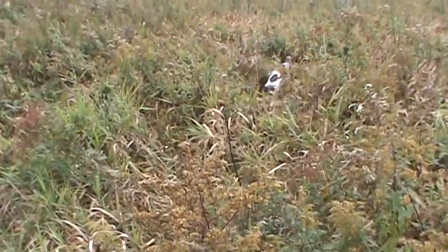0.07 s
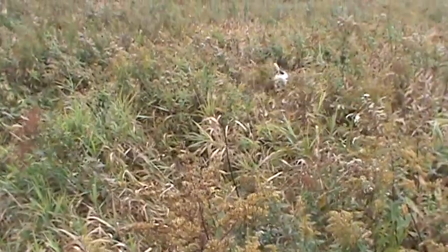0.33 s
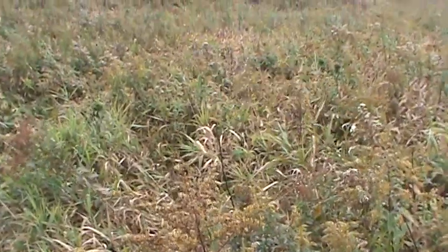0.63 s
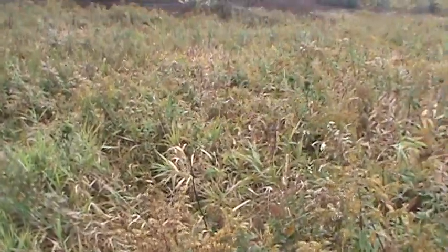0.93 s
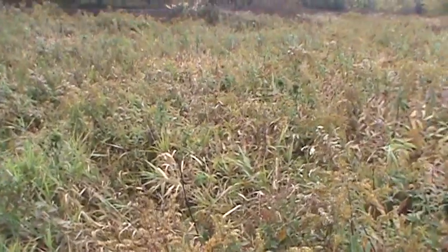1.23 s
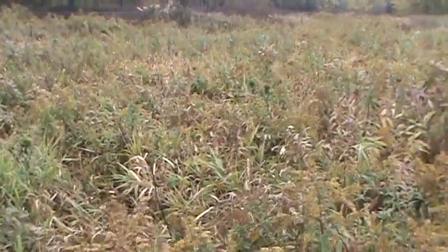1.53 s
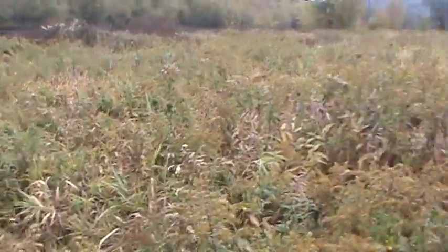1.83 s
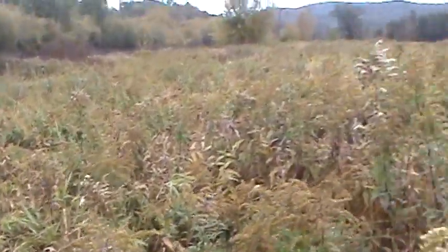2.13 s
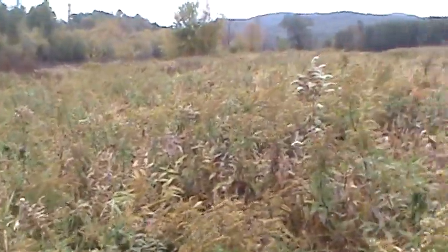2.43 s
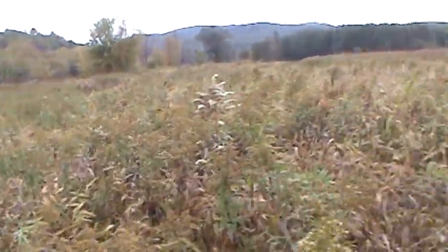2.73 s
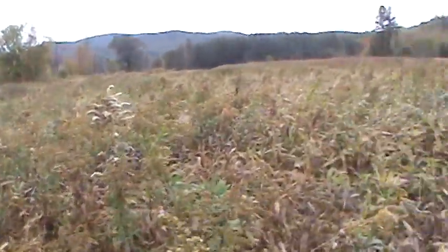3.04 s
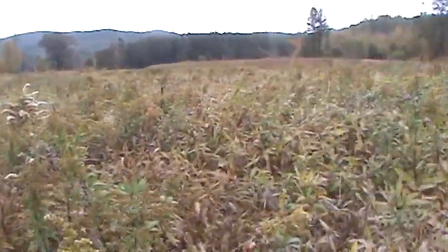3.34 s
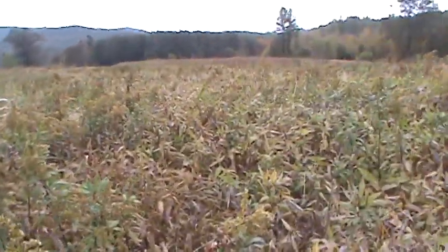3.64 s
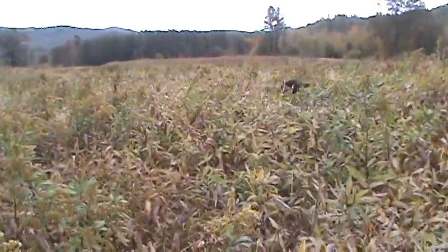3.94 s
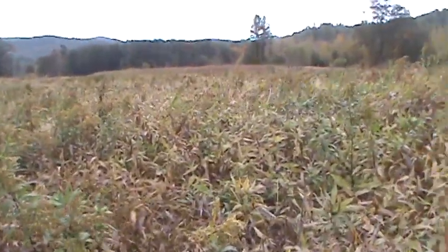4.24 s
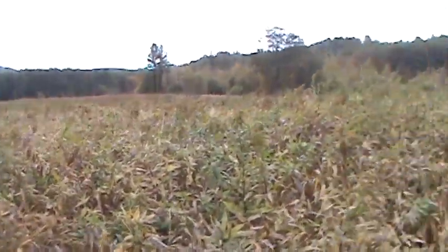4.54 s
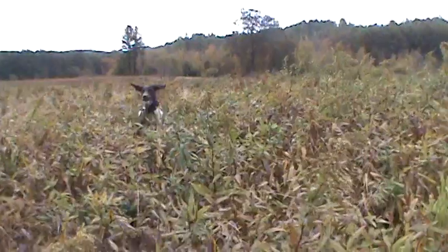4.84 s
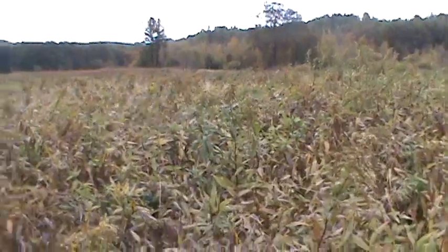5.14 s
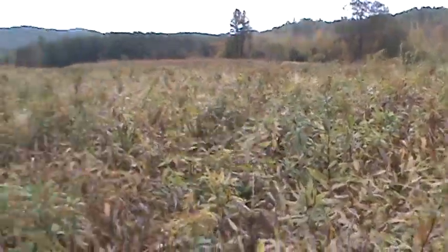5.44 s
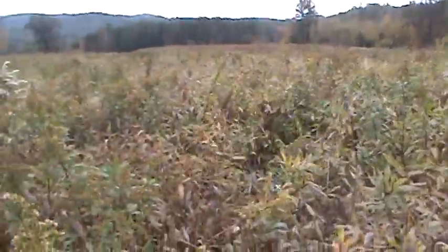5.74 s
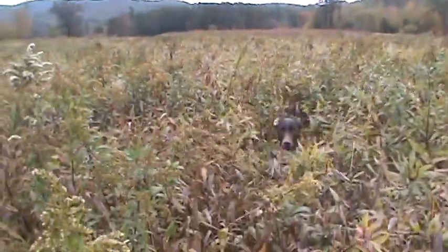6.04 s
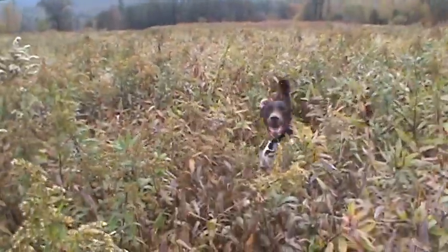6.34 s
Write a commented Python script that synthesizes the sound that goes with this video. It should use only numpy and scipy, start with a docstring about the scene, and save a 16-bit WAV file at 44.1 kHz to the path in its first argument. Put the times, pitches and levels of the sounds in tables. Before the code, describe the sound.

Dry brush rustles and crackles around a running dog while its little bell clinks brightly, with soft paw thuds underneath.

```python
"""A field of tall dry weeds: a dog bounds through it and comes running up close.
The clapper of its small collar bell strikes unevenly, ringing the wall's modes and then choking them.
Leaves swish and crackle along its body with each bound, over a low trampling rumble and faint far air.
Paws thud on soft ground, stalks snap, and a hand-held camera gives a few hollow plastic clicks."""
import sys
import numpy as np
from scipy import signal
from scipy.io import wavfile
from scipy.ndimage import uniform_filter1d

SR = 44100
rng = np.random.default_rng(int(sys.argv[2]) if len(sys.argv) > 2 else 0)


def inscribe(sig):
    """Save sig as 16-bit PCM at rate SR to the path in sys.argv[1].

    A 1-D sig is mono; a 2-D sig holds one channel per row.
    Samples are clipped to [-1, 1] before scaling.
    """
    pcm = np.round(np.clip(np.atleast_2d(sig).T, -1, 1) * 32767)
    wavfile.write(sys.argv[1], SR, pcm.astype(np.int16))


N = 285768
TIME = np.arange(N) / SR
SIDES = np.array([[1], [-1]])  # left, right

# Clapper hits on the bell: (time [s], fundamental level [dB], second mode level [dB],
# overtone level [dB], pitch the struck spot favours [Hz], fundamental t60 [s])
CLAPPER_HITS = [(0.045, -34, -48, -20.5, 5000, 0.15), (0.1177, -40, -49, -23.5, 6155, 0.63),
                (0.229, -18, -31, -19, 5000, 0.052), (0.2962, -33, -47, -28, 5000, 0.24),
                (0.4178, -26, -53, -22, 5000, 0.11), (0.519, -26, -66, -27, 8810, 0.077),
                (0.542, -27.5, -48, -36, 6155, 0.25), (0.5755, -26, -45, -18.5, 5000, 0.19),
                (0.694, -27.5, -43, -56, 6155, 0.21), (0.773, -29, -41.5, -35, 5000, 0.33),
                (0.881, -29, -57, -33, 5000, 0.25), (1.0127, -33, -50, -24.5, 4424, 0.25),
                (1.022, -24, -38, -19.5, 5412, 0.16), (1.085, -23.5, -29, -16.5, 7680, 1.0),
                (1.1146, -21, -25, -24, 4424, 0.21), (1.198, -12.5, -28.5, -20.5, 6155, 0.19),
                (1.2483, -27, -49, -23.5, 6155, 0.11), (1.2657, -22, -31, -12.5, 4424, 0.1),
                (1.3036, -17, -35, -16.5, 6155, 0.12), (1.361, -40, -58, -32.5, 5412, 0.2),
                (1.425, -23.5, -55, -27, 7680, 0.6), (1.473, -30, -43, -34, 6155, 0.19),
                (1.4916, -16.5, -27, -14.5, 6155, 0.045), (1.5068, -15, -18, -24, 7680, 0.022),
                (1.518, -20, -29.5, -21, 8810, 0.18), (1.589, -24, -39.5, -26.5, 5412, 0.19),
                (1.6915, -31, -37.5, -22.5, 4424, 0.25), (1.811, -17, -32.5, -14, 5000, 0.062),
                (1.9021, -25.5, -43, -23, 5000, 0.056), (2.084, -29.5, -48, -28, 5000, 0.44),
                (2.1407, -29, -49, -41, 4424, 0.13), (2.226, -28, -28.5, -17.5, 5000, 0.11),
                (2.3406, -19, -26.5, -15.5, 5000, 0.042), (2.3777, -32, -58, -30, 5000, 0.21),
                (2.609, -30.5, -53, -35, 6155, 0.091), (2.827, -15.5, -35, -14, 5000, 0.022),
                (2.8856, -20.5, -48, -15, 5000, 0.049), (3.0062, -35, -36.5, -31.5, 7680, 0.27),
                (3.1157, -28, -33, -28, 7680, 0.18), (3.2309, -31, -51, -34.5, 5000, 0.21),
                (3.303, -30.5, -54, -18, 6155, 0.096), (3.3838, -25.5, -68, -27, 7680, 0.36),
                (3.3916, -26, -52, -25.5, 5000, 0.11), (3.4521, -22, -36, -18, 5412, 0.16),
                (3.488, -19.5, -34, -13, 5412, 0.15), (3.5337, -29, -40, -36, 5412, 0.52),
                (3.6724, -13, -23, -18, 6155, 0.12), (3.733, -14.5, -25.5, -20.5, 8810, 0.076),
                (3.772, -22, -38, -25.5, 5000, 0.077), (3.845, -16, -33, -22.5, 6155, 0.091),
                (3.9342, -19, -32, -23.5, 5412, 0.099), (3.9593, -18, -42, -19.5, 8810, 0.095),
                (4.0518, -24, -39, -21, 7680, 0.34), (4.0739, -29.5, -39, -24.5, 5000, 0.26),
                (4.3386, -28, -32, -17.5, 5412, 0.11), (4.4639, -18, -18, -19.5, 8810, 0.17),
                (4.5214, -25, -52, -20, 4424, 0.069), (4.5535, -35, -53, -28.5, 6155, 0.14),
                (4.6541, -19.5, -23.5, -17.5, 6155, 0.11), (4.7122, -25, -36, -27.5, 5412, 0.21),
                (5.526, -43, -36, -21, 5412, 0.41), (5.6776, -27.5, -31, -16.5, 5000, 0.22),
                (5.8148, -20, -23, -15.5, 8810, 0.076), (5.8554, -29, -43, -37, 7680, 0.28),
                (5.9297, -31, -43, -31, 4424, 0.27), (5.966, -38.5, -49, -23, 5000, 0.5),
                (6.0338, -41.5, -51, -29, 5412, 0.3), (6.1859, -22.5, -29, -13, 6155, 0.13),
                (6.2273, -31.5, -30.5, -13.5, 5412, 1.0), (6.4356, -33.5, -29, -15.5, 6155, 0.48)]
# Modes of the bell wall: (pitch [Hz], level among the overtones [dB],
# shortness [0 = rings like the fundamental, 1 = like an overtone])
BELL_MODES = [(2005.6, 0, 0.0044), (3434, 0, .3), (4424, -2, .9), (5000, 4, 1), (5412, -5.5, 0.8),
              (6155, -3.5, 0.97), (7680, 0, .9), (8810, -5, 1), (11406, -1.5, 0.82), (11510, -5.5, .9),
              (12000, -12, 1), (12600, -11.5, 0.79), (13800, -12, 0.62), (14900, -16, 1)]


def from_db(db):
    """Decibels to gain."""
    return np.exp(np.asarray(db) * (np.log(10) / 20))


def at_hz(points, hz):
    """Read a curve on a log-frequency axis."""
    points = np.array(points)
    return np.interp(np.log(hz), np.log(points[:, 0]), points[:, 1])


def band(x, low_hz, high_hz):
    """Second-order Butterworth band-pass."""
    sos = signal.butter(2, [low_hz, min(high_hz, .45 * SR)], "band", fs=SR, output="sos")
    return signal.sosfilt(sos, x + 1e-18)


def drift(rate_hz):
    """Smooth random modulation with unit rms, drawn every 40 samples."""
    pole = np.exp(-80 * np.pi * rate_hz / SR)
    slow = signal.lfilter([1], [1, -2 * pole, pole * pole], rng.standard_normal(N // 40 + 2002))[2000:]
    slow /= np.sqrt(np.mean(slow ** 2) + 1e-20)
    return np.interp(np.arange(N) / 40, np.arange(len(slow)), slow)


def fade(age, t60):
    """Exponential decay, 60 dB down after t60 seconds."""
    return np.exp(-np.log(1000) * age / t60)


def ring(clicks, hz, t60):
    """Resonator: a unit click sets a sine of height 1 ringing."""
    radius, angle = fade(1 / SR, t60), 2 * np.pi * hz / SR
    return signal.lfilter([0, np.sin(angle)], [1, -2 * radius * np.cos(angle), radius ** 2],
                          clicks + 1e-18)


def impulses(times, levels_db):
    """One click per event."""
    out = np.zeros(N)
    out[np.clip(np.round(np.asarray(times) * SR).astype(int), 0, N - 1)] = from_db(levels_db)
    return out


def bursts(times, levels_db, t60):
    """A quickly dying puff of noise per event."""
    envelope = signal.lfilter([1], [1, -fade(1 / SR, t60)], impulses(times, levels_db) + 1e-18)
    return envelope * rng.standard_normal(N)


def banded_noise(spectrum, flicker_db, flicker_hz, sheen_db=0):
    """Stereo noise, normalised before each band flickers on its own and sheen lifts the treble."""
    # Stereo image: (frequency [Hz], left-right correlation [0..1])
    correlation = [(60, 0.97), (150, 1), (330, 0.83), (700, 0.87), (1400, 0.88), (2800, 1), (5500, 1),
                   (9000, 0.81), (14000, 0.69)]
    low, high = spectrum[0][0], min(spectrum[-1][0], .44 * SR)
    edges = np.geomspace(low, high, int(2.6 * np.log2(high / low)) + 1)
    white, out, power = rng.standard_normal((2, 2, N)), 0, 0
    for k, (low, high) in enumerate(zip(edges, edges[1:])):
        mid, side = band(white[k % 2], low, high)
        hz = np.sqrt(low * high)
        alike, gain = at_hz(correlation, hz), from_db(at_hz(spectrum, hz))
        treble = at_hz([(4000, 0), (10000, 1)], hz)
        power += 2 * gain ** 2 * np.var(mid)
        gain = gain * from_db(flicker_db * drift(flicker_hz) + treble * sheen_db)
        out = out + gain * (np.sqrt(1 + alike) * mid + np.sqrt(1 - alike) * side * SIDES)
    return out / np.sqrt(power)


def thicket(x, scatter_db, t60):
    """Stalks and ground scatter a short diffuse tail, different at each ear."""
    age = TIME[:SR // 4]
    tail = rng.standard_normal((2, len(age))) * fade(age, t60) * (age > .001)
    tail /= np.sqrt(np.sum(tail ** 2, axis=1, keepdims=True))
    return x + from_db(scatter_db) * signal.fftconvolve(np.atleast_2d(x), tail, axes=1)[:, :N]


def far_air(level_db=-58):
    """A faint, flickering bed of distant air."""
    # Colour of the air: (frequency [Hz], relative density [dB])
    air_colour = [(300, -8.5), (520, -25), (800, -16), (1300, 41), (3000, -0.5), (15000, 17)]
    return from_db(level_db) * banded_noise(air_colour, flicker_db=4.0, flicker_hz=13.0)


def swish_envelope(stir_db=-48, stir_sheen_db=-1, release_ratio=1.38):
    """Bounds swell and fall, adding in power over a steady stir of leaves. Gives level and sheen in dB."""
    # Bounds through the leaves: (peak time [s], level [dB], swell time [s], treble sheen [dB])
    bounds = [(.02, -41.5, 0.04, 2.5), (.25, -47, 0.17, 9.5), (.39, -41.5, 0.067, 3),
              (.56, -42, 0.031, -0.5), (.93, -45, 0.069, -1), (1.28, -48.5, 0.053, 4),
              (1.47, -41, 0.043, -1.5), (1.918, -43, 0.073, -4), (2.061, -40, 0.069, -3),
              (2.289, -45, 0.068, 2), (2.699, -39, 0.083, -3), (2.939, -44, .13, -2),
              (3.199, -38.5, 0.066, -4.5), (3.349, -41, .055, -2), (3.572, -41, 0.14, -4),
              (3.799, -40, 0.089, -2.5), (4.079, -43.5, 0.2, -4), (4.319, -38, 0.066, -6.5),
              (4.601, -45, 0.18, -7), (5.04, -37.5, 0.14, -1), (5.2, -35.5, 0.067, -1.5),
              (5.47, -33.5, 0.14, -2), (5.67, -32.5, 0.057, -1), (5.839, -37.5, 0.059, -1),
              (5.989, -43, 0.085, -0.5), (6.279, -39.5, 0.089, 0.5), (6.451, -31, 0.092, -2.5)]
    power = from_db(stir_db) ** 2
    sheen = power * stir_sheen_db
    for peak_s, db, swell_s, sheen_db in bounds:
        width = np.where(TIME < peak_s, swell_s, swell_s * release_ratio)
        bound = from_db(db) ** 2 * np.exp(-np.minimum(((TIME - peak_s) / width) ** 2, 20))
        power, sheen = power + bound, sheen + bound * sheen_db
    return 10 * np.log10(power), sheen / power


def leaves(swish_db, sheen_db, level_db=6.5):
    """Countless dry leaves brush the dog's coat and merge into a swish."""
    # Colour of the swish: (frequency [Hz], relative density [dB])
    leaf_colour = [(300, -10.5), (480, -10), (780, -1.5), (1250, -10.5), (1700, -4), (2600, -4.5),
                   (4000, -0.5), (6000, -1), (7800, -5), (11000, -2), (13800, -13), (16000, -15)]
    rustle = banded_noise(leaf_colour, flicker_db=2.0, flicker_hz=26.0, sheen_db=sheen_db)
    return from_db(swish_db + level_db) * rustle


def crackle(swish_db, per_s=400, size_db=2.4, level_db=5.5):
    """Single brittle leaves crack at random pitches, their level riding the swish."""
    accents_db = size_db * np.minimum(rng.exponential(1, N), 4)
    sizes = from_db(swish_db + level_db + accents_db) * rng.choice([-1, 1], N)
    cracks = sizes * (rng.random(N) < per_s / SR)
    pitches = np.geomspace(2200, 12000, 12)
    pitch_index = rng.integers(0, len(pitches), N)
    return sum(ring(cracks * (pitch_index == k), hz, t60=1.6 / hz) for k, hz in enumerate(pitches))


def trampling(swish_db, level_db=-52.5, follow=0.66, stride_s=0.83):
    """Stalks and soil rumble under each bound and ease off in between."""
    # Colour of the rumble: (frequency [Hz], relative density [dB])
    rumble_colour = [(12, -42), (20, -9), (86, 2), (118, -1.5), (155, -2.5), (242, -2), (276, 3.5),
                     (377, -18), (500, -18), (650, -34), (1100, -120)]
    swing_db = swish_db - uniform_filter1d(swish_db, int(stride_s * SR))
    rumble = banded_noise(rumble_colour, flicker_db=2.5, flicker_hz=8.7)
    return from_db(level_db + follow * swing_db) * rumble


def mode_levels(favour_db=13, favour_shape=0.26, tilt_per_octave=0.38, chance_db=1.2):
    """Mode levels per hit, in dB: the struck spot favours one overtone, and hard hits are brighter."""
    _, fundamental_db, second_db, overtones_db, spot_hz, _ = np.transpose(CLAPPER_HITS)[:, :, None]
    hz, db, _ = np.transpose(BELL_MODES)[:, 2:]
    octaves = np.log2(hz / spot_hz)
    hardness_db = overtones_db - fundamental_db
    db = db - favour_db * np.abs(octaves) ** favour_shape + tilt_per_octave * hardness_db * octaves
    db = db + chance_db * rng.uniform(-1.2, 1, db.shape)
    share_db = db - 10 * np.log10(np.sum(from_db(db) ** 2, axis=1, keepdims=True))
    return np.hstack([fundamental_db, second_db, overtones_db + share_db])


def bell(level_db=1.16, contact_s=0.00051, settle_s=0.11, hold=1.24, choke_share=0.42, press=.03,
         doppler=0.001245, twin_share=0.38, twin_beat_hz=72, flutter_db=1.0, pan_db=0.85):
    """Each hit restarts the modes; they ring until the clapper settles on the wall and chokes them."""
    times, *_, fundamental_t60 = np.transpose(CLAPPER_HITS)
    overtone_t60 = np.minimum(.042 + .17 * fundamental_t60, 0.0958)
    heights = from_db(level_db + mode_levels())
    hit = np.maximum(np.searchsorted(times, TIME, side="right") - 1, 0)  # latest hit at each sample
    age = np.maximum(TIME - times[hit], 0)
    free = (TIME >= times[0]) / (1 + (age / settle_s) ** 6)
    # the clapper chatters on the wall for the first milliseconds, roughening every mode
    chatter = 0.3 * fade(age, t60=0.012) * drift(330)
    # tumbling shifts the pitch a little and swings each mode's lobes, so its level flutters
    tumble = doppler * drift(7.9)
    attack_pole = np.exp(-1 / (contact_s * SR))
    out = 0
    for k, (hz, _, shortness) in enumerate(BELL_MODES):
        t60 = np.abs(fundamental_t60) ** (1 - shortness) * np.abs(overtone_t60) ** shortness
        detune, facing, twin_side, twin_start = rng.uniform(-1, 1, size=(len(times), 4)).T
        pitch = hz * (1 + .006 * shortness * detune)
        # a clapper that stays pressed to the wall damps the fundamental and raises it
        pitch = pitch * (1 + press * (1 - shortness) * np.exp(-(t60 / 0.07) ** 2))
        decay = fade(age, hold * t60[hit]) / (1 + (age / (choke_share * t60[hit])) ** 4)
        envelope = heights[hit, k] * decay * free
        envelope = signal.lfilter([1 - attack_pole], [1, -attack_pole], envelope + 1e-18)
        phase = 2 * np.pi * np.cumsum(pitch[hit] * (1 + tumble)) / SR + chatter
        # the wall is not quite round: each overtone beats with a weaker twin
        beat_cycles = twin_beat_hz * np.sign(twin_side)[hit] * age + twin_start[hit]
        twin = twin_share * shortness * np.sin(phase + 2 * np.pi * beat_cycles)
        tone = envelope * from_db(flutter_db * drift(74)) * (np.sin(phase) + twin)
        out = out + tone * from_db(pan_db * facing * SIDES)[:, hit]
    return out


def clapper_ticks(tick_db=-2.5, clack_db=12.5):
    """Metal ticks on metal; the wall, stiffened by the clapper, clacks just above its fundamental."""
    times, fundamental_db, _, overtones_db, _, _ = np.transpose(CLAPPER_HITS)
    tick = bursts(times, overtones_db + tick_db, t60=0.014)
    clack = bursts(times, (fundamental_db + overtones_db) / 2 + clack_db, t60=0.016)
    return band(tick, low_hz=1730, high_hz=9400) + band(clack, low_hz=2013, high_hz=2240)


def clapper_grazes(per_s=5.0, level_db=-37.5):
    """The loose clapper grazes the wall at random and wakes only the fundamental."""
    touches = rng.random(N) < per_s / SR
    return from_db(level_db) * ring(touches, BELL_MODES[0][0], t60=0.19)


def paw_thuds():
    """Soft ground answers a paw with a few low cycles."""
    # Paw landings: (time [s], level [dB], pitch [Hz])
    landings = [(0.071, -30, 167), (0.093, -26, 147), (.421, -31, 244), (1.499, -35, 160), (2.08, -34, 165),
                (3.22, -33, 150), (4.297, -23.5, 87), (4.498, -28.5, 277.4), (5.667, -25, 200),
                (5.741, -18, 118.3)]
    ground = sum(ring(impulses([s], [db]), hz, t60=0.03) for s, db, hz in landings)
    return band(ground, low_hz=56, high_hz=900)


def stalk_snaps(level_db=-0.5):
    """A dry stalk breaks with one bright crack."""
    # Breaking stalks: (time [s], level [dB])
    breaks = [(1.2513, -17.5), (3.0463, -11), (3.538, -20), (3.732, -10.5), (4.3364, -21), (4.446, -13.5)]
    times, break_db = np.transpose(breaks)
    return band(bursts(times, break_db + level_db, t60=0.0065), low_hz=2800, high_hz=11800)


def collar_pings():
    """Buckle and ring of the collar touch, one faint note per contact."""
    # Contacts of the fittings: (time [s], level [dB], pitch [Hz], t60 [s])
    contacts = [(1.275, -32.5, 1316, 0.12), (2.281, -40, 1725, 0.26), (2.278, -34, 4440, 0.22)]
    return sum(ring(impulses([s], [db]), hz, t60) for s, db, hz, t60 in contacts)


def camera_clicks(tap_db=-3.0, rub_db=3.5, lean_db=11.0):
    """A finger clicks and rubs on the hollow plastic case; its modes lean left and right by turns."""
    # Finger clicks on the case: (time [s], level [dB])
    clicks = [(1.583, -19), (1.609, -22), (1.6281, -14.5), (3.5396, -25), (4.2937, -24), (4.476, -23.5),
              (4.5006, -21), (4.59, -29.5), (4.711, -23.5), (4.743, -25.5), (4.834, -25), (4.9013, -22),
              (4.907, -27), (4.9183, -14.5), (5.802, -30)]
    # Resonances of the case: (pitch [Hz], level [dB], t60 [s])
    case_modes = [(755, -47, 0.042), (1096, -16.5, 0.04), (1390, -3.5, 0.0058), (2070, -6, 0.0078),
                  (3020, -7.5, 0.0027), (4700, -13, 0.005)]
    times, click_db = np.transpose(clicks)
    taps = impulses(times, click_db + tap_db)
    body = sum(from_db(db + lean_db * SIDES * (-1) ** k) * ring(taps, hz, t60)
               for k, (hz, db, t60) in enumerate(case_modes))
    rub = band(bursts(times, click_db + rub_db, t60=0.053), low_hz=800, high_hz=1490)
    return band(body + rub, low_hz=720, high_hz=9260)


def scene():
    """Jingle and brush pan gently with the dog; rumble and far air lie all round."""
    # The dog's path across the stereo field: (time [s], left minus right [dB])
    bearing = [(0, -0.9), (1.8, -0.3), (2.7, 0), (3.8, -0.2), (4.3, 0), (5.2, .8), (6.4, -1)]
    bearing_db = np.interp(TIME, *np.transpose(bearing))
    swish_db, sheen_db = swish_envelope()
    air = far_air()
    collar = bell() + clapper_ticks() + clapper_grazes() + collar_pings()
    jingle = thicket(collar, scatter_db=-15.5, t60=0.028)
    swish = leaves(swish_db, sheen_db)
    cracks = thicket(crackle(swish_db) + stalk_snaps(), scatter_db=-7.5, t60=0.014)
    dog = (jingle + swish + cracks) * from_db(bearing_db * SIDES / 2)
    return dog + camera_clicks() + paw_thuds() + trampling(swish_db) + air


def record(dry):
    """A steep low-pass shaves off the very top."""
    cutoff_hz = 15900
    return signal.sosfilt(signal.ellip(12, .1, 80, cutoff_hz, fs=SR, output="sos"), dry)


dry = scene()
out = record(dry)
inscribe(out)
```